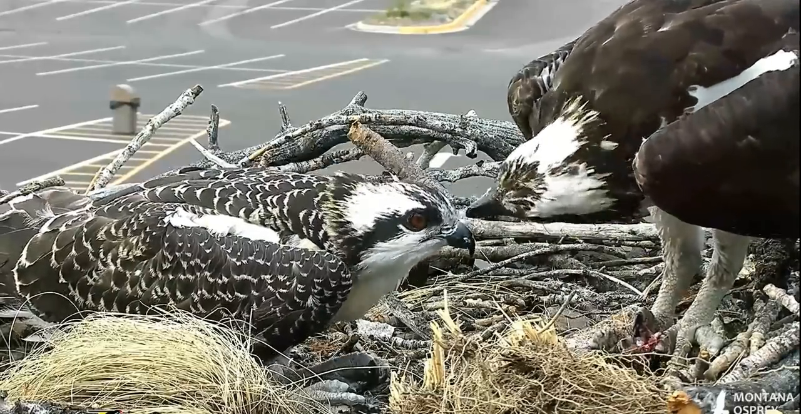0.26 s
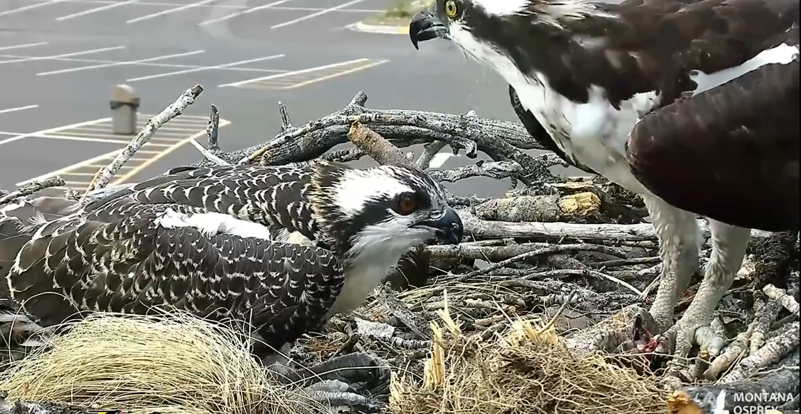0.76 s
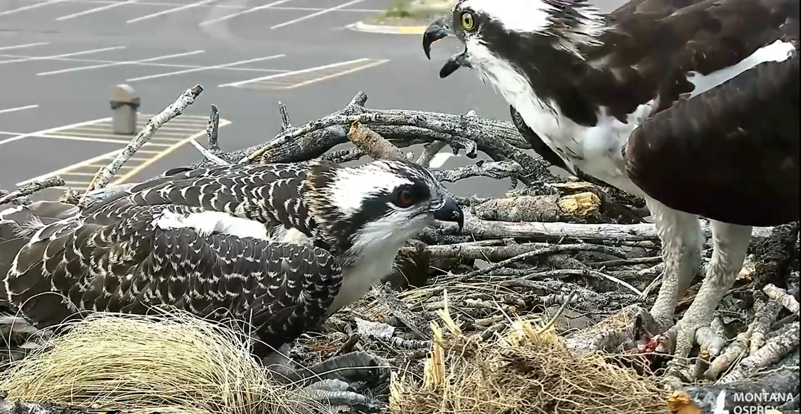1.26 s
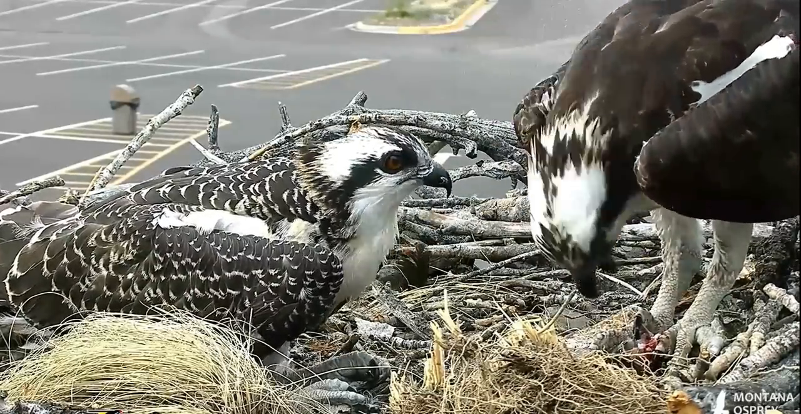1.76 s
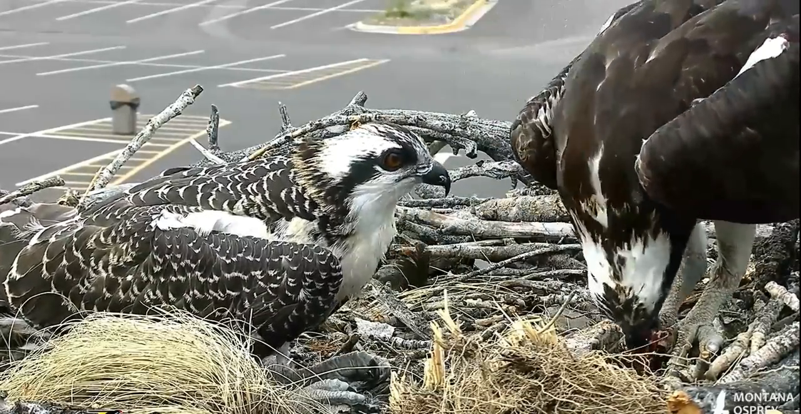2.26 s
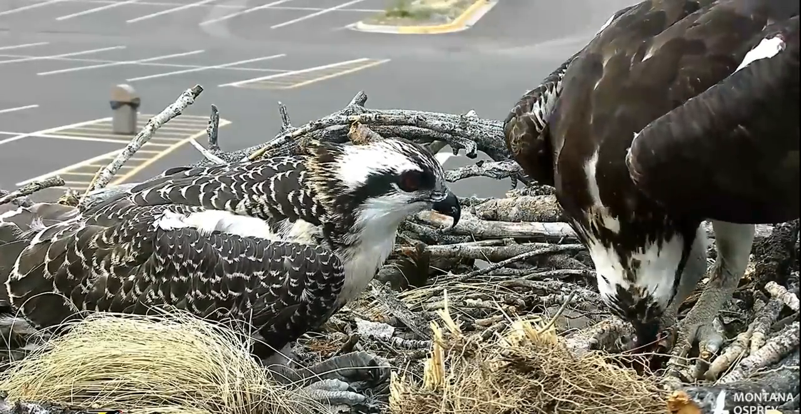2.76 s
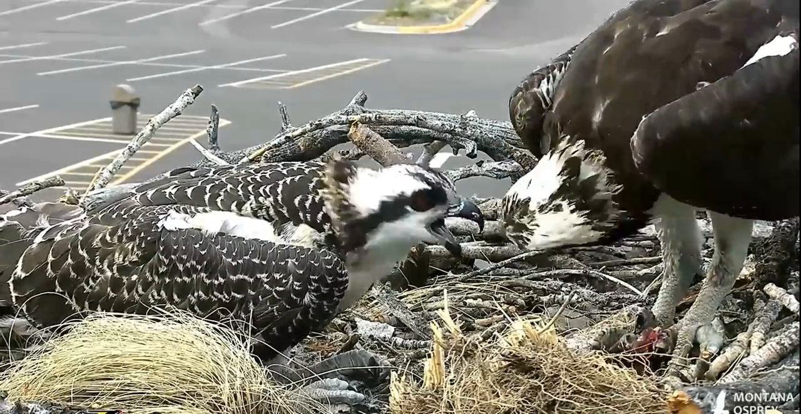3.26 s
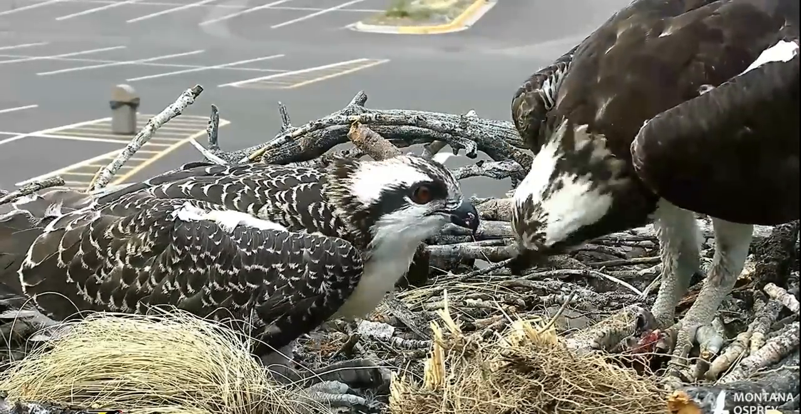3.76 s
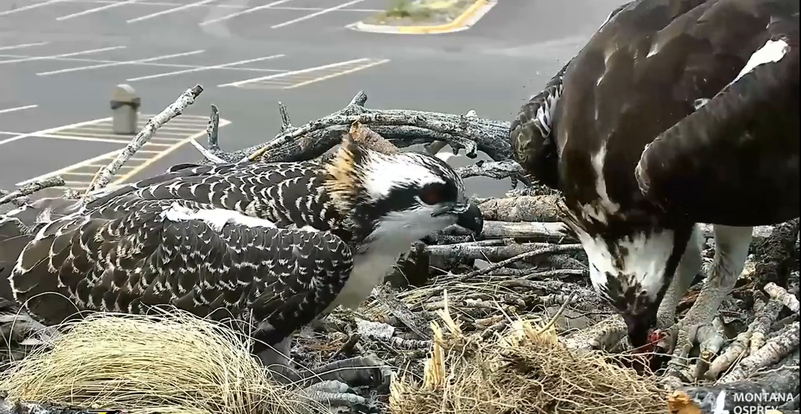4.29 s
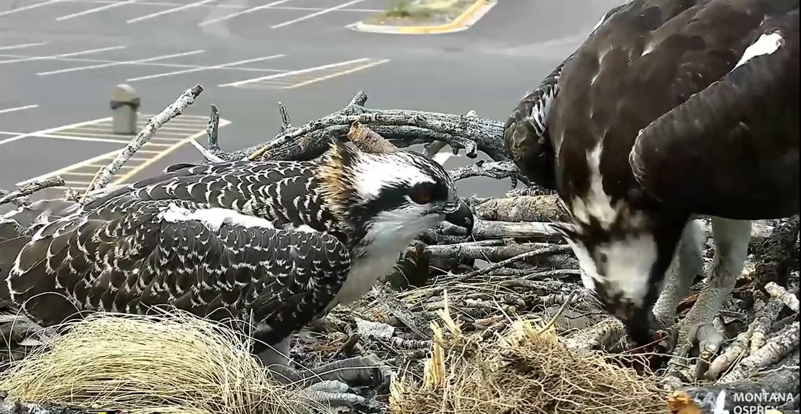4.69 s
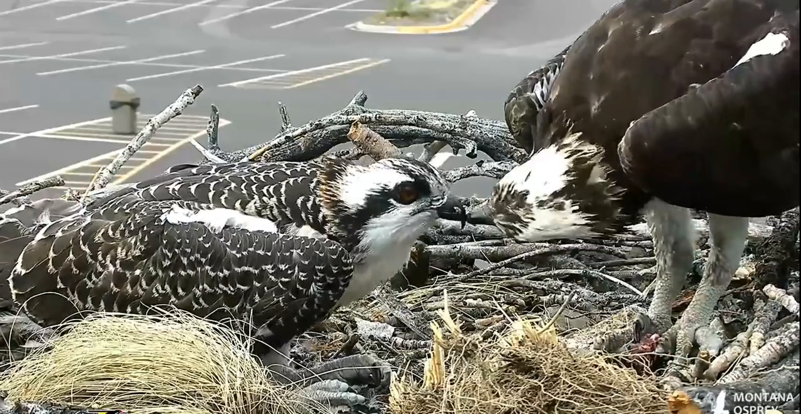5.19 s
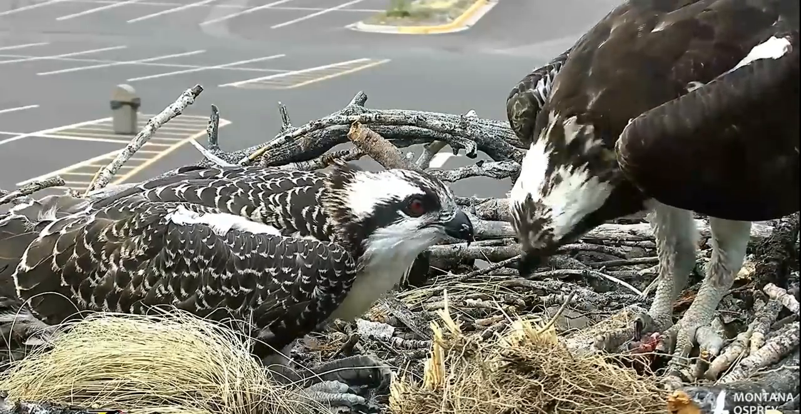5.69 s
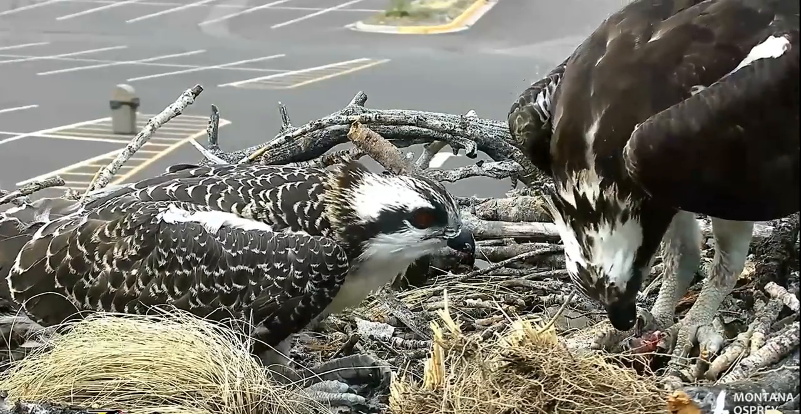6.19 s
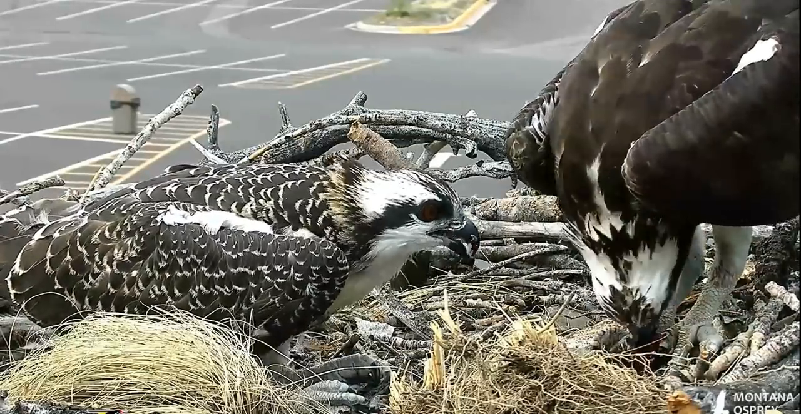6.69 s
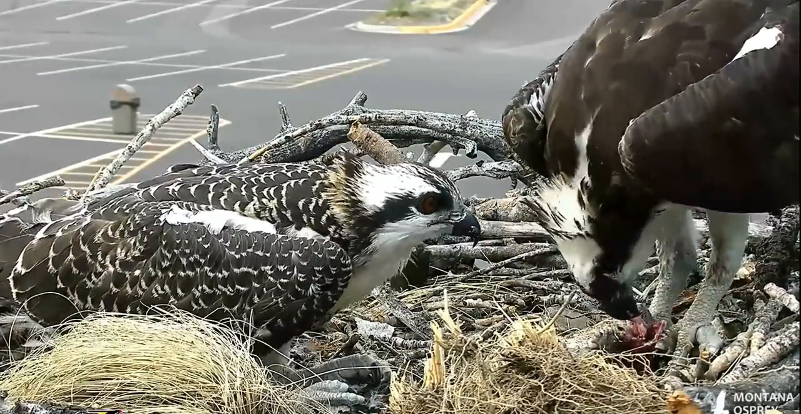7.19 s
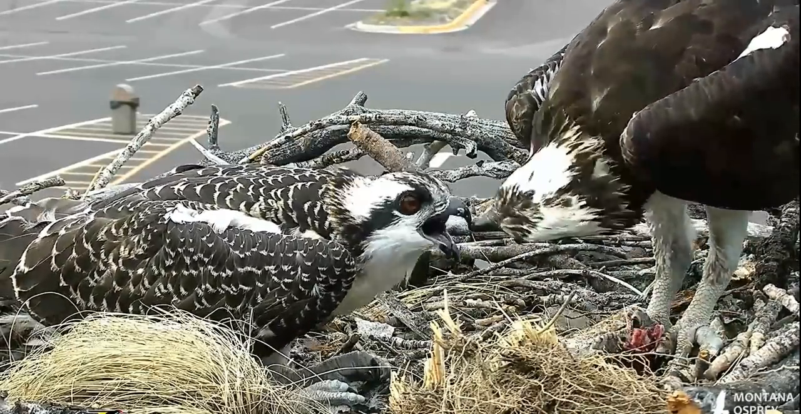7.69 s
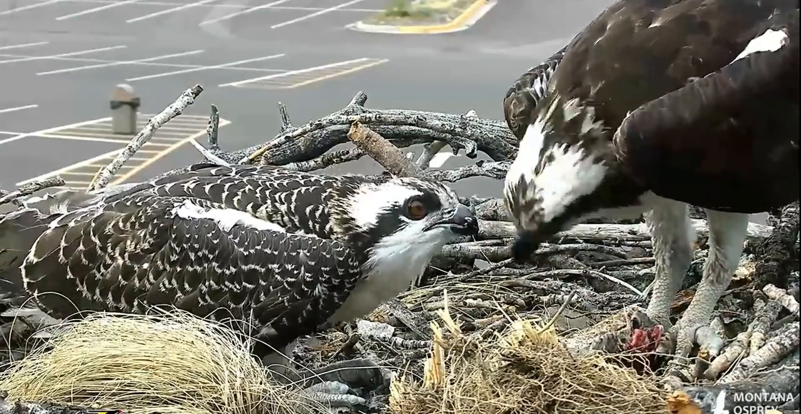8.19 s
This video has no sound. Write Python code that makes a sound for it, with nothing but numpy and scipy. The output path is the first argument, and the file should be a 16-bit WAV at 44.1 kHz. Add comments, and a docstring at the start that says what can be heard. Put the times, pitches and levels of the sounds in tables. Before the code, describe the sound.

Close to a nest microphone outdoors, an osprey chick calls in a rapid series of bright, piercing whistles with sudden cracks in pitch. It then drops to quieter, raspy chirps in three groups: three calls, then two, then six. Between the later groups a distant songbird whistles very faintly. The air is open with almost no echo, and a soft, even hiss continues throughout.

```python
"""Young osprey begging at the nest

A chick begs while an adult feeds it: one bout of loud, clear whistles, then three softer, hoarse bouts.
Its calls leap between a low and a high register; at times both sides of the syrinx sound at once.
A nest camera hears it in open air over faint hiss and a far songbird. The camera's coarse sampling
mirrors every sound into the top treble."""
import sys
import numpy as np
from scipy import signal
from scipy.fft import rfft, irfft, next_fast_len
from scipy.io import wavfile
from scipy.ndimage import uniform_filter1d

SR = 44100
rng = np.random.default_rng(int(sys.argv[2]) if len(sys.argv) > 2 else 0)


def to_wav(sig):
    """Store sig (one row per channel, or 1-D mono) as 16-bit WAV at the path in sys.argv[1].

    Samples outside -1..1 are clipped; the rate is SR.
    """
    pcm = np.clip(np.atleast_2d(sig), -1, 1) * 32767
    pcm = np.round(pcm).astype(np.int16)
    wavfile.write(sys.argv[1], SR, pcm.T)  # frames by channels


N = 372644

# Outdoor hush spectrum: freq_hz, gain_db
HUSH_SPECTRUM = [(24, -32.5), (40, 1), (59, -7), (131, -5.5), (280, -6), (361, -7), (484, -16), (635, -19),
                 (700, -14.5), (975, -12.5), (1410, -0.5), (2080, -6), (2740, 0), (3590, -11),
                 (4200, -27.5), (5460, -55.5), (9240, -120)]
# Electronic hiss spectrum: freq_hz, gain_db
ELECTRONIC_SPECTRUM = [(3000, -33), (4200, -3.5), (6000, -2.5), (7200, -7.5), (9000, -10.5), (11500, -15),
                       (13500, -6), (15500, -6.5)]
# Clear whistles, one contour each; pitch steps are register leaps: time_s, pitch_hz, level_db
WHISTLES = [
    [(0.845, 2187, -60.5), (0.851, 2343, -41.5), (0.868, 2645, -31.5), (0.876, 2740, -43.5),
     (0.877, 3285, -43), (0.892, 3270, -40.5), (0.899, 3060, -50), (0.907, 3470, -39), (0.923, 3140, -24.0),
     (0.938, 3020, -33.5), (0.941, 2470, -45), (0.948, 2160, -51)],
    [(1.029, 2360, -63.5), (1.031, 2407, -40.5), (1.043, 2573, -24), (1.049, 2650, -28.5),
     (1.05, 3070, -35), (1.051, 2850, -27.5), (1.054, 2880, -28.5), (1.083, 2700, -27.0),
     (1.096, 3102, -24.5), (1.107, 3098, -25.5), (1.115, 2995, -33.5), (1.117, 2560, -41),
     (1.12, 2440, -30.5), (1.13, 2180, -55)],
    [(1.212, 2375, -50), (1.22, 2482, -30.5), (1.235, 2683, -22.0), (1.24, 2670, -31), (1.241, 3353, -28),
     (1.249, 3270, -22), (1.296, 3222, -25.0), (1.306, 3010, -37.5), (1.307, 2690, -35.5),
     (1.312, 2550, -26), (1.326, 2210, -53)],
    [(1.414, 2460, -52.0), (1.42, 2592, -27), (1.436, 2810, -23.5), (1.473, 2978, -24), (1.5, 2964, -24.5),
     (1.521, 2800, -26.5), (1.532, 2454, -38), (1.537, 2340, -57)],
    [(1.633, 2674, -64.5), (1.637, 2820, -35), (1.646, 3043, -34), (1.676, 3154, -29), (1.712, 3066, -30.5),
     (1.784, 3137, -26.5), (1.79, 3400, -41.5), (1.791, 4370, -58.5), (1.826, 4450, -60),
     (1.848, 4190, -58), (1.857, 3710, -50.5), (1.858, 2970, -28), (1.866, 2730, -35.5),
     (1.879, 2320, -52.5)],
    [(1.994, 2620, -53), (2.0, 2625, -32.0), (2.018, 2775, -34.0), (2.019, 3890, -53), (2.037, 4120, -60),
     (2.091, 3860, -60.5), (2.113, 4000, -69), (2.168, 4680, -57.5), (2.205, 4980, -52.5),
     (2.222, 4670, -54.5), (2.223, 3940, -44.5), (2.23, 3470, -34), (2.238, 3670, -50), (2.239, 2680, -42),
     (2.243, 2560, -35.5), (2.253, 2260, -56)],
]
# Other side of the syrinx, below two high whistles: time_s, pitch_hz, level_db
SECOND_VOICE = [
    [(1.812, 3970, -69.5), (1.816, 4110, -69.5), (1.836, 4020, -52.5), (1.855, 3530, -52)],
    [(2.019, 3490, -42), (2.027, 3530, -38.0), (2.045, 3730, -58), (2.056, 3550, -66)],
]
# Overtone strength by pitch: pitch_hz, gain_db
OVERTONE_BY_PITCH = [(2300, -22.5), (2700, -33), (2960, -29), (3130, -37.5), (3350, -38.5), (3700, -40),
                     (4400, -32.5)]
# Extra overtone strength from call to call: time_s, gain_db
OVERTONE_BY_TIME = [(.86, -0.5), (1.1, -3.5), (1.47, 4), (1.7, -2.5), (2.2, 2), (3.3, 7), (3.65, -6),
                    (5.28, 7), (7.25, 2), (8.4, 1)]
# Rasp spectrum: freq_hz, gain_db
RASP_SPECTRUM = [(2000, -36.5), (2650, -6), (3050, -7.5), (3450, 2), (3950, -11), (4500, -35), (5100, -22),
                 (6000, -33), (8000, -42.5)]
# Hoarse calls, levels before throat gain and swell: start_s, break_s, close_s, low_hz, high_hz, close_hz,
# open_db, broken_db, high_db, rasp_db, cleared_db, close_db
HOARSE_CALLS = [(2.603, 2.613, 2.660, 3400, 3730, 2930, -72, -72, -74, -66.5, -72, -72),
                (3.222, 3.278, 3.317, 3264, 3940, 2990, -46.5, -43, -63, -50.5, -52, -42),
                (3.390, 3.404, 3.512, 3280, 4360, 3010, -45, -61.5, -59, -58.5, -49, -60),
                (3.619, 3.648, 3.685, 3070, 3890, 2760, -49, -67, -64.5, -65, -55.5, -44),
                (5.228, 5.28, 5.326, 3200, 3940, 2940, -42, -54, -46, -55, -50, -40.5),
                (5.422, 5.427, 5.538, 3100, 4360, 3100, -44, -65, -59.5, -60, -52, -57),
                (7.229, 7.261, 7.292, 3430, 3810, 3310, -42, -62, -53, -54, -50, -37.5),
                (7.429, 7.431, 7.503, 3690, 4110, 3480, -50, -54.5, -52, -58.5, -43, -39.5),
                (7.618, 7.634, 7.728, 3465, 4280, 3405, -49, -52.5, -45, -52, -47, -38.5),
                (7.813, 7.827, 7.944, 3300, 4410, 3084, -43.5, -57.5, -46.5, -47, -45, -45.5),
                (8.066, 8.081, 8.168, 3345, 4270, 2924, -49.5, -58, -54.5, -53, -43.5, -38),
                (8.321, 8.341, 8.414, 3160, 4060, 3270, -48, -59, -47, -56.5, -40.5, -37)]
# Throat resonance: pitch_hz, gain_db
THROAT = [(2400, -8.5), (2900, -4), (3450, 3.5), (3900, -7), (4250, -14), (4600, -12.5)]
# Shrill rasp at the height of a call: freq_hz, gain_db
SHRILL_SPECTRUM = [(3800, -32), (4600, -6.5), (5000, 4.5), (5400, -4), (6300, -21.5), (9000, -30.5)]
# Squeaks around the hoarse calls: start_s, first_hz, last_hz, level_db
SQUEAKS = [(3.210, 3480, 3950, -51.5), (7.220, 3630, 4100, -57.5), (7.313, 4040, 3580, -61),
           (7.413, 3700, 4200, -59), (7.521, 4120, 3670, -59), (7.617, 3600, 4250, -52)]
# Far songbird's slurred whistles: start_s, end_s, first_hz, last_hz, level_db
SONGBIRD_NOTES = [(4.878, 4.97, 2380, 2320, -75), (5.332, 5.54, 2285, 2360, -69.5),
                  (6.19, 6.302, 2560, 2430, -64), (6.27, 6.428, 2880, 2630, -63.5),
                  (6.35, 6.53, 2540, 2350, -69), (6.42, 6.602, 2274, 2130, -77),
                  (6.843, 6.951, 2450, 2330, -72), (7.027, 7.11, 2010, 1930, -73),
                  (8.173, 8.238, 2570, 2550, -65.5)]
# Strength of the sampling image: freq_hz, gain_db
MIRROR_RESPONSE = [(8000, -15), (10500, -18.5), (11800, -12.5), (12700, -18.5), (13500, -19.5),
                   (14500, -29), (15500, -36.5)]

OVERLAP_S = 0.0081  # high voice and rasp enter this long before the break
CLEAR_LEAD_S, CLEAR_RAMP_S = 0.013, 0.0022  # the voice clears just before the close
OPEN_ROUGH, BROKEN_ROUGH, HIGH_ROUGH, CLOSE_ROUGH = 0.28, 0.44, 0.39, 0.33  # roughness, 0-1


def amp(db):
    """Decibels to gain."""
    return 10 ** (np.asarray(db) / 20)


def unit(x):
    """Scale to rms 1."""
    return x / np.sqrt(np.mean(np.abs(x) ** 2) + 1e-20)


def gain_at(points, hz):
    """Gain from (freq_hz, gain_db) points on a log frequency axis."""
    freq_hz, gain_db = np.transpose(points)
    return amp(np.interp(np.log(hz + 1), np.log(freq_hz + 1), gain_db))


def filtered(x, response):
    """Apply the gain response(hz)."""
    size = next_fast_len(len(x) + SR // 4)
    return irfft(rfft(x, size) * response(np.fft.rfftfreq(size, 1 / SR)), size)[:len(x)]


def noise(spectrum):
    """Shaped noise, rms 1."""
    return unit(filtered(rng.standard_normal(N), lambda hz: gain_at(spectrum, hz)))


def flutter(width_hz):
    """Low-passed random curve, rms 1."""
    return unit(filtered(rng.standard_normal(N), lambda hz: 1 / (1 + (hz / width_hz) ** 2)))


def complex_flutter(width_hz):
    """Random amplitude and phase."""
    return flutter(width_hz) + 1j * flutter(width_hz)


def span(start_s, end_s, attack_s, release_s):
    """Sample indices i, progress u (0-1) and fade of one note."""
    i = np.arange(round(start_s * SR), min(round(end_s * SR), N))
    fade_in = np.sin(np.pi / 2 * np.clip((i - i[0]) / SR / attack_s, 0, 1)) ** 2
    fade_out = np.clip((i[-1] - i) / SR / release_s, 0, 1)
    return i, np.linspace(0, 1, len(i)), fade_in * fade_out


def hiss(hush_db=-63, drift_db=1.2, electronic_db=-81):
    """Gently drifting outdoor hush over thin electronic hiss."""
    hush = amp(hush_db + drift_db * flutter(width_hz=2)) * noise(HUSH_SPECTRUM)
    return hush + amp(electronic_db) * noise(ELECTRONIC_SPECTRUM)


def partials(phase, multiples, levels_db):
    """Partials locked to one phase."""
    return sum(amp(db) * np.exp(1j * k * phase) for k, db in zip(multiples, levels_db))


def syrinx(notes, chaos_hz=190, jitter=0.0038, wander=0.018, wander_hz=55):
    """Near-pure notes (i, pitch_hz, gain, rough); roughness shakes pitch and strength."""
    out = np.zeros(N)
    chaos = unit(complex_flutter(chaos_hz))
    waver = flutter(wander_hz)
    doubling = unit(complex_flutter(wander_hz))
    for i, pitch_hz, gain, rough in notes:
        ragged_hz = pitch_hz * (1 + (jitter + wander * rough) * waver[i])
        phase = 2 * np.pi * np.cumsum(ragged_hz) / SR
        # a pressed voice adds overtones and intermittent period doubling
        harmonics = partials(phase, [2, 3], levels_db=[0.5, -25.5])
        subharmonics = doubling[i] * partials(phase, [.75, 1.5, 2.5], levels_db=[-13.5, -24.5, -28.5])
        press_db = np.interp(i / SR, *np.transpose(OVERTONE_BY_TIME))
        press = amp(press_db) * gain_at(OVERTONE_BY_PITCH, pitch_hz)
        tone = np.exp(1j * phase) + press * (harmonics + subharmonics)
        shake = np.sqrt(1 - rough ** 2) + rough * chaos[i]
        out[i] += np.sqrt(2) * gain * np.real(shake * tone)
    return out


def whistles(leap_s=0.0019, swell_s=0.0035):
    """Clear calls that leap registers: steadier when blown harder, rasping when strained high."""
    soft_rough, loud_rough, firm_db, firm_span_db = .25, .025, -36, 6
    strain_hz, strain_span_hz, strain_db = 4550, 150, -2.5
    notes, strain = [], np.zeros(N)
    for contour in [*WHISTLES, *SECOND_VOICE]:
        time_s, hz, db = np.transpose(contour)
        i, _, fade = span(time_s[0], time_s[-1], attack_s=0.0015, release_s=0.0016)
        pitch_hz = uniform_filter1d(np.interp(i / SR, time_s, hz), size=round(leap_s * SR))
        level_db = uniform_filter1d(np.interp(i / SR, time_s, db), size=round(swell_s * SR))
        firmness = (1 + np.tanh((level_db - firm_db) / firm_span_db)) / 2
        rough = soft_rough + (loud_rough - soft_rough) * firmness
        notes.append((i, pitch_hz, fade * amp(level_db), rough))
        strain[i] = amp(level_db + strain_db) * np.clip((pitch_hz - strain_hz) / strain_span_hz, 0, 1)
    return syrinx(notes) + strain * rasp()


def ground_scatter(x, level_db=-36, t60_s=0.61, build_s=0.027):
    """Faint tail scattered back by the ground far below the nest."""
    t = np.arange(SR) / SR
    tail = rng.standard_normal(SR) * amp(-60 * t / t60_s) * (1 - np.exp(-t / build_s))
    return amp(level_db) * signal.fftconvolve(x, tail / np.linalg.norm(tail))[:N]


def rasp():
    """Chaotic vibration in the throat's resonance, limited by the membranes' swing; rms 1."""
    swing = signal.hilbert(noise(RASP_SPECTRUM))
    return unit(np.real(swing) / np.sqrt(1 + np.abs(swing) ** 2 / 2))


def low_voice(start_s, break_s, end_s, top_hz, open_db, broken_db):
    """One side of the syrinx slides up to pitch, then turns ragged at the break."""
    sag, rise_s, handover_s = .2, 0.022, 0.014
    i, _, fade = span(start_s, end_s, attack_s=0.0064, release_s=0.0037)
    pitch_hz = top_hz * (1 - sag * np.exp(-(i / SR - start_s) / rise_s))
    broken = np.clip((i / SR - break_s) / handover_s, 0, 1)
    gain = amp(open_db + (broken_db - open_db) * broken) * gain_at(THROAT, pitch_hz)
    rough = OPEN_ROUGH + (BROKEN_ROUGH - OPEN_ROUGH) * broken
    return i, pitch_hz, fade * gain, rough


def high_voice(break_s, close_s, top_hz, close_hz, high_db, cleared_db):
    """The other side arches above the throat's resonance and clears as it falls back."""
    sag, rise_s, fall_power, leap_ratio, swell_db = .15, .016, 7.2, 1.09, 8.5
    i, u, fade = span(break_s - OVERLAP_S, close_s, attack_s=0.0056, release_s=0.0023)
    rising_hz = top_hz * (1 - sag * np.exp(-(i - i[0]) / SR / rise_s))
    pitch_hz = rising_hz - (top_hz - leap_ratio * close_hz) * u ** fall_power
    cleared = np.clip((i / SR - close_s + CLEAR_LEAD_S) / CLEAR_RAMP_S, 0, 1)
    level_db = (1 - cleared) * (high_db + swell_db * (u - .5)) + cleared * cleared_db
    rough = HIGH_ROUGH + (CLOSE_ROUGH - HIGH_ROUGH) * cleared
    return i, pitch_hz, fade * amp(level_db) * gain_at(THROAT, pitch_hz), rough


def closing_chirp(close_s, close_hz, close_db, length_s=0.018, fall_hz_per_s=33500, fall_db=12.5):
    """The voice snaps back to a low note that sinks and dies."""
    i, u, fade = span(close_s, close_s + length_s, attack_s=0.0017, release_s=0.003)
    pitch_hz = close_hz - fall_hz_per_s * length_s * u
    gain = amp(close_db - fall_db * u ** 2) * gain_at(THROAT, pitch_hz)
    return i, pitch_hz, fade * gain, CLOSE_ROUGH


def hoarse_calls(rasp_swell_db=4):
    """Low voice, high voice, closing chirp. Rasp swells in the break, shriller in higher calls."""
    shrill_ref_db, shrill_ref_hz, shrill_db_per_hz = -6.5, 5090, .01
    crest_at, crest_width = 0.77, .22  # fractions of the rasp's length
    notes, rasp_gain, shrill_gain = [], np.zeros(N), np.zeros(N)
    for (start_s, break_s, close_s, low_hz, high_hz, close_hz,
         open_db, broken_db, high_db, rasp_db, cleared_db, close_db) in HOARSE_CALLS:
        clear_s = close_s - CLEAR_LEAD_S + CLEAR_RAMP_S
        notes += [low_voice(start_s, break_s, clear_s, low_hz, open_db, broken_db),
                  high_voice(break_s, close_s, high_hz, close_hz, high_db, cleared_db),
                  closing_chirp(close_s, close_hz, close_db)]
        i, u, fade = span(break_s - OVERLAP_S, clear_s, attack_s=.006, release_s=.004)
        rasp_gain[i] = fade * amp(rasp_db + rasp_swell_db * (u - 1.5))
        crest = np.exp(-((u - crest_at) / crest_width) ** 2)
        shrill_db = rasp_db + shrill_ref_db + shrill_db_per_hz * (high_hz - shrill_ref_hz)
        shrill_gain[i] = fade * crest * amp(shrill_db)
    return syrinx(notes) + rasp_gain * rasp() + shrill_gain * noise(SHRILL_SPECTRUM)


def squeaks(length_s=0.014, decay_db_per_s=602, rough=0.28):
    """Brief glides as the syrinx tightens before a call or slackens after it."""
    notes = []
    for start_s, first_hz, last_hz, level_db in SQUEAKS:
        i, u, fade = span(start_s, start_s + length_s, attack_s=0.0029, release_s=0.0062)
        pitch_hz = first_hz + (last_hz - first_hz) * u
        gain = fade * amp(level_db - decay_db_per_s * length_s * u)
        notes.append((i, pitch_hz, gain, rough))
    return syrinx(notes)


def songbird(blur=0.99, blur_hz=30):
    """Thin, distant glides, blurred by arriving over many paths."""
    out = np.zeros(N)
    paths = unit(1 + blur * complex_flutter(blur_hz))
    for start_s, end_s, first_hz, last_hz, level_db in SONGBIRD_NOTES:
        i, u, fade = span(start_s, end_s, attack_s=0.013, release_s=0.028)
        phase = 2 * np.pi * np.cumsum(first_hz + (last_hz - first_hz) * u) / SR
        out[i] += np.sqrt(2) * amp(level_db) * fade * np.real(paths[i] * np.exp(1j * phase))
    return out


def scene():
    """Chick close by in open air, songbird far off; mono."""
    chick = whistles() + hoarse_calls() + squeaks()
    return (chick + ground_scatter(chick) + songbird() + hiss())[None]


def record(dry, camera_rate_hz=16000, band_limit_hz=15450):
    """Coarse sampling mirrors each frequency about half the camera's rate; a hard low-pass follows."""
    x = dry[0]
    image = 2 * x * np.cos(2 * np.pi * camera_rate_hz * np.arange(N) / SR)
    x = x + filtered(image, lambda hz: gain_at(MIRROR_RESPONSE, hz))
    return filtered(x, lambda hz: hz < band_limit_hz)[None]


dry = scene()
out = record(dry)
to_wav(out)
```